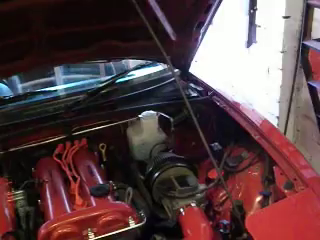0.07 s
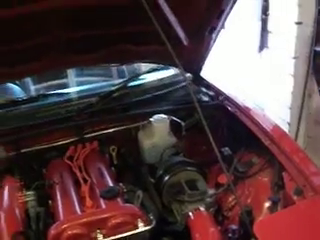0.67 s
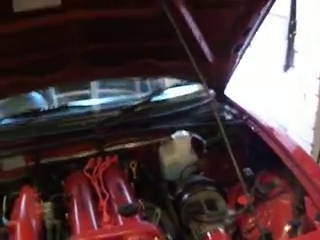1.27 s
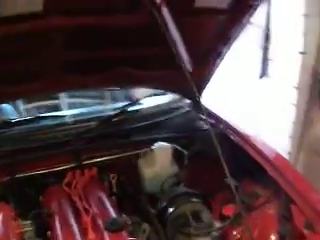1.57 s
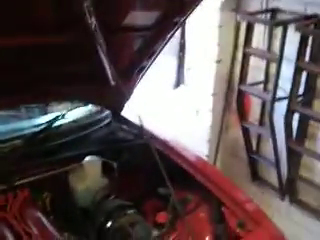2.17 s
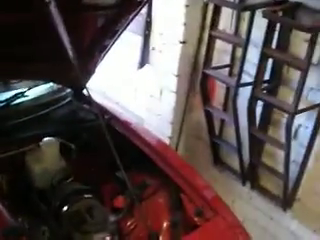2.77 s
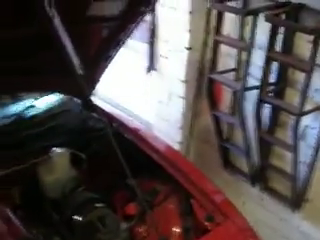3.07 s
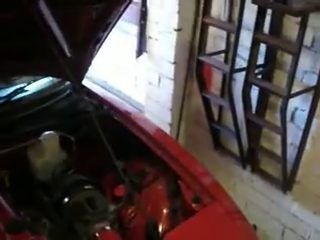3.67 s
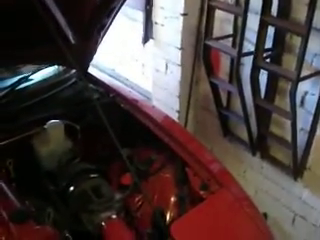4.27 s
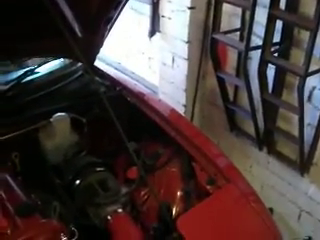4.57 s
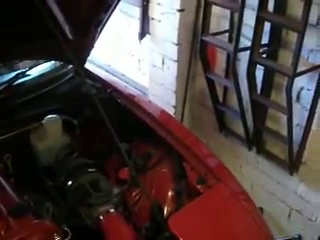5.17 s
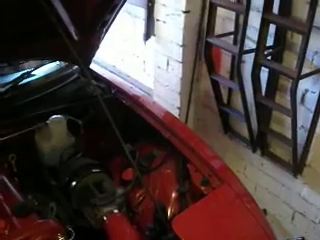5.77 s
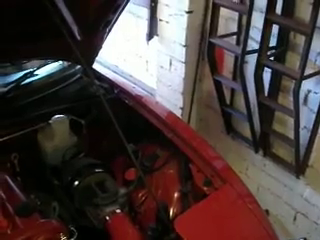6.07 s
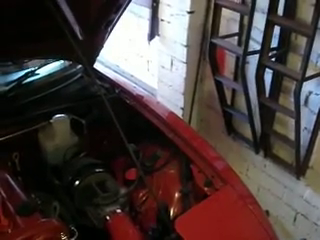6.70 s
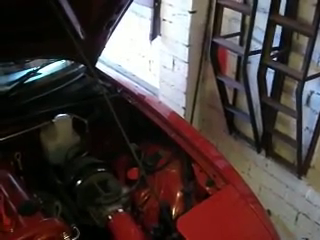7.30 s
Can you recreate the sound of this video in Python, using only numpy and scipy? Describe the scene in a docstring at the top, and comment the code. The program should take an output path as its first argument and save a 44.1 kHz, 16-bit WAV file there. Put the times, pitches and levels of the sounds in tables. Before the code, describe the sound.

Sharp, uneven ticks from loose valve gear ring out over the clatter, dull knocks and low boom of an idling car engine. It is heard close up in a garage, through a hand-held microphone moving over the open bay. Near the end the engine speeds up and holds a fast idle, the boom thinning as a soft whine appears. Two brief handling clicks occur, one early and one just before the end.

```python
"""A four-cylinder petrol engine idles in an open bay inside a garage, its loose valve gear ticking.
Irregular impacts excite the resonances of its steel, over block clatter, dull piston slaps and the
periodic boom of the exhaust. Near the end the revs rise and the meshing teeth of the timing belt whine.
A hand-held microphone moves along the bay and is knocked twice; its gain ducks after loud peaks."""
import sys
import numpy as np
from scipy import signal
from scipy.fft import rfft, irfft, next_fast_len
from scipy.io import wavfile
from scipy.ndimage import uniform_filter1d, map_coordinates

SR = 44100
rng = np.random.default_rng(int(sys.argv[2]) if len(sys.argv) > 2 else 0)


def transcribe(u):
    """Save the signal u as a 16-bit wav file named by the first command-line argument.

    u: samples, shape (n,) or (channels, n), limited to [-1, 1]; the rate is SR.
    q: integer samples, one column per channel.
    """
    v = np.clip(np.atleast_2d(u).T, -1, 1)
    q = np.round(v * 32767).astype(np.int16)
    wavfile.write(sys.argv[1], SR, q)


N = 328104
IDLE_HZ = 27.5  # firings per second


def amp(db):
    """Decibels as an amplitude ratio."""
    return 10 ** (np.asarray(db) / 20)


def unit(x):
    """Normalisation to rms 1."""
    return x / np.sqrt(np.mean(x ** 2) + 1e-20)


def along(points, hz):
    """Interpolation of (Hz, value) points on a logarithmic frequency axis."""
    f, values = np.transpose(points)
    return np.interp(np.log(hz + 1), np.log(f + 1), values)


def curves(rows):
    """Linear interpolation in time: one value per sample for each column after the first."""
    times, *columns = np.transpose(rows)
    return [np.interp(np.arange(N) / SR, times, column) for column in columns]


def wobble(rate):
    """Smooth random modulation: a spline through `rate` knots a second."""
    return map_coordinates(rng.standard_normal(int(N * rate / SR) + 4), [np.arange(N) * rate / SR])


def filtered(x, gain):
    """Zero-phase filtering by a gain that depends on frequency."""
    size = next_fast_len(N + SR // 2)
    return irfft(rfft(x, size) * gain(np.fft.rfftfreq(size, 1 / SR)), size)[:N]


def add(track, start_s, sound):
    """Superposition of a sound on the track."""
    part = track[max(round(start_s * SR), 0):][:len(sound)]
    part += sound[:len(part)]


def resonance_db(resonances, hz):
    """Resonance: each mode adds a bell-shaped peak or dip in dB."""
    return sum(lift / (1 + (2 * (hz - f) / width) ** 2) for f, width, lift in resonances)


def struck(force, spectrum, resonances, coupling=1, size=8192):
    """Convolution: a force rings metal through a minimum-phase impulse response of unit energy."""
    hz = np.fft.rfftfreq(size, 1 / SR)
    db = along(spectrum, hz) + coupling * resonance_db(resonances, hz)
    db -= 40 * np.clip(hz / 6300 - 1, 0, 1)  # treble roll-off
    cepstrum = irfft(np.log(amp(db)))[:size // 2]
    causal = 2 * cepstrum * (np.arange(size // 2) > 0)
    ring = irfft(np.exp(rfft(causal, size)))
    return signal.oaconvolve(force, ring / np.linalg.norm(ring))[:N]


def scattered(envelope):
    """Multipath scattering: a blow becomes a burst of noise with a nearly flat spectrum."""
    x = envelope * rng.standard_normal(len(envelope))
    for _ in range(6):  # flatten the spectrum, then restore the envelope
        x = irfft(np.exp(1j * np.angle(rfft(x))), len(x))
        x = x * envelope / np.sqrt(np.abs(uniform_filter1d(x * x, size=64)) + 1e-20)
    return x


def bay_reverb(x, t60, wet_db):
    """Reverberation: dense reflections between bonnet, bulkhead and walls decay exponentially."""
    t = np.arange(SR // 4) / SR
    tail = rng.standard_normal(len(t)) * amp(-60 * t / t60) * (t > .003)
    return x + amp(wet_db) * signal.fftconvolve(x, tail / np.linalg.norm(tail))[:N]


# The microphone's path. Each row: time in seconds, place from 0 (over the manifold) to 1 (by the wing).
MIC_PATH = [(0, 0), (1.2, 0), (1.9, 0.53), (3.2, 0.41), (4.2, 1), (7.44, 0.94)]
# Resonances and gaps of block, manifold and valve cover.
# Each row: frequency in Hz, width in Hz, lift in dB over the manifold, lift in dB by the wing.
METAL_MODES = [(538.2, 30, 4.5, 10), (664, 40, -5.5, -3.5), (728, 33, 4, 6.5), (893, 58, 10, 6.5),
               (962.5, 24, 5.5, 10.5), (1020, 42, 6.5, 3.5), (1106, 31, 3, 4.5), (1164, 71, 5.5, 0),
               (1270, 79, -7.5, -3), (1681, 29, 5.5, 6), (1764, 35, -0.5, 10.5), (1823, 45, 5, 7.5),
               (1980, 45, 8, 0.5), (2043, 47, 8, 9), (2095, 33, 5.5, 4), (2210, 72, -5, -1),
               (2660, 37, 5, 7), (3360, 66, 6, 5), (3490, 59, -0.5, 8.5), (4910, 100, 10, 7)]
def engine_metal(force, spectrum, coupling=1):
    """Directional radiation: the strength of each resonance depends on the listening position."""
    place = curves(MIC_PATH)[0]
    manifold = struck(force, spectrum, [(hz, width, db) for hz, width, db, _ in METAL_MODES], coupling)
    wing = struck(force, spectrum, [(hz, width, db) for hz, width, _, db in METAL_MODES], coupling)
    return (1 - place) * manifold + place * wing


# Finger knocks. Each row: start in seconds, level in dB.
CASE_KNOCKS = [(2.4272, 5.5), (7.1172, 4)]
# Modes of the case. Each row: frequency in Hz, level in dB, time to fall 60 dB in seconds.
CASE_MODES = [(670, -18, 0.018), (1257, -4, 0.013), (1414, -3.5, 0.016), (1820, -1, 0.009),
              (3400, -13, 0.007)]
def case_knocks():
    """Damped free vibration: the microphone's plastic case rings when a finger knocks it."""
    t = np.arange(SR // 16) / SR
    ring = sum(amp(db - 60 * t / t60) * np.sin(2 * np.pi * hz * t) for hz, db, t60 in CASE_MODES)
    attack = 1 - np.exp(-t / 0.00081)
    track = np.zeros(N)
    for start, db in CASE_KNOCKS:
        noise = 0.35 * amp(-60 * t / 0.016) * rng.standard_normal(len(t))
        add(track, start, amp(db) * attack * (ring + noise))
    return track


# Belt tones: teeth mesh 11.5 times a firing, with sidebands and overtones.
# Each row: multiple of the firing rate, level in dB.
BELT_TONES = [(9, -7), (10.5, -10.5), (11.5, 0.5), (12.5, -6), (20.5, -11), (23, -4), (24, -8.5)]
# Resonances that the belt excites. Each row: frequency in Hz, width in Hz, lift in dB.
BELT_MODES = [(453.5, 80, 14), (537, 49, 18.9), (1010, 40, 19)]
def belt_whine(firing_hz, firings):
    """Forced vibration: meshing tones grow with the revs and swell as they glide through resonances."""
    flutter = 0.16 * wobble(30) + 0.12 * wobble(80)
    drive_db = -58.5 + 16.5 * np.log2(firing_hz / IDLE_HZ)
    whine = np.zeros(N)
    for order, db in BELT_TONES:
        level = amp(drive_db + db + resonance_db(BELT_MODES, order * firing_hz) + 0.74 * wobble(22))
        whine += level * np.sin(2 * np.pi * (order * firings + rng.random()) + flutter)
    return np.sqrt(2) * whine


# Piston knocks. Each row: time in seconds, level in dB.
PISTON_SLAPS = [(0.323, -12), (0.759, -10), (0.836, -13.5), (1.081, -13), (1.665, -9), (2.292, -8.5),
                (2.962, -11), (3.412, -11.5), (3.559, -14), (3.66, -13), (4.299, -14), (4.4, -17.5),
                (4.659, -13), (5.001, -11), (5.497, -13.5)]
# Their spectrum. Each row: frequency in Hz, level in dB.
SLAP_SPECTRUM = [(300, -10.5), (700, -1), (1200, 0), (2000, -1), (3000, -9), (6000, -16)]
def piston_slaps(level_db=-2.5, rise_s=.001, t60=.055):
    """Impact excitation: a piston rocks against its bore and rings the block with a dull knock."""
    t = np.arange(SR // 12) / SR
    envelope = (1 - np.exp(-t / rise_s)) * amp(-60 * t / t60)
    force = np.zeros(N)
    for time, db in PISTON_SLAPS:
        add(force, time - rise_s, amp(level_db + db) * scattered(envelope))
    return engine_metal(force, SLAP_SPECTRUM, coupling=0.7)


# The boom dips briefly as the revs climb and returns weaker. Each row: time in seconds, level in dB.
BOOM_LEVELS = [(0, -14.5), (5.4, -14), (5.63, -10.5), (6.08, -18), (6.17, -38.5), (6.33, -21),
               (7.44, -20.5)]
# Exhaust and block hum, plus one accessory's hum at 5.17 times the firing rate. Each row: multiple of the
# firing rate, level in dB.
OVERTONES = [(2, -37.5), (3, -46.5), (4, -50), (5.17, -56.5), (6, -55), (7, -52.5), (8, -50.5), (9, -52),
             (10, -49.5), (11, -49), (12, -45.5), (13, -51), (14.5, -46.5)]
# Air resonances of the bay. Each row: frequency in Hz, width in Hz, lift in dB.
AIR_MODES = [(94, 7.9, 5), (112.7, 13, 9.5), (140.9, 22, 13), (218.4, 11, 11), (293, 11, -2)]
# Load as the throttle opens. Each row: time in seconds, boost in dB, an unused level in dB.
THROTTLE_LOAD = [(0, -1, -1), (5.35, -2, -2), (5.5, 0.5, 4), (5.66, 7.5, 10.5), (5.85, 0.5, -2),
                 (6.3, -3, -2), (7.25, -2.5, -2), (7.44, 2.5, 5)]
# Spectrum of the exhaust's rumble. Each row: frequency in Hz, level in dB.
RUMBLE_SPECTRUM = [(8, -17.5), (18, 4.5), (35, 1.5), (60, -20), (100, -22), (200, -33.5), (500, -87.5)]
def exhaust(firing_hz, firings, hum_db=0.27, rumble_db=-24.5):
    """Periodic excitation: firing pulses make a boom and overtones, joined by an accessory's hum, coloured by
    the bay, over a rumble."""
    load_db = curves(THROTTLE_LOAD)[0]
    note = -amp(curves(BOOM_LEVELS)[0]) * np.sin(2 * np.pi * firings)
    for order, db in OVERTONES:
        air_db = resonance_db(AIR_MODES, order * firing_hz)
        boost_db = load_db * 2 / order  # load feeds mainly the low overtones
        level = amp(hum_db + db + air_db + boost_db + 1.7 * wobble(9))
        note += level * np.sin(2 * np.pi * (order * firings + rng.random()) + 0.3 * wobble(13))
    rumble = unit(filtered(rng.standard_normal(N), lambda hz: amp(along(RUMBLE_SPECTRUM, hz))))
    return np.sqrt(2) * note + amp(rumble_db + load_db) * rumble


def contacts(rate):
    """Shot noise: random small impacts, `rate` a second on average, at rms 1."""
    return unit((rng.random(N) < rate / SR) * rng.standard_normal(N))


def cam_contacts(firings, jitter_s, count=170):
    """Cyclic excitation: impacts recur at the same shaft angles every four firings, at rms 1."""
    angles, strengths = 4 * rng.random(count), rng.uniform(-1, 1, count)
    due = np.arange(0, firings[-1], 4)[:, None] + angles
    samples = np.interp(due, firings, np.arange(N), right=2 * N)
    samples += jitter_s * SR * rng.standard_normal(due.shape)
    sizes = strengths * amp(1.8 * rng.standard_normal(due.shape))
    return unit(np.bincount(np.abs(samples).astype(int).ravel(), sizes.ravel(), N)[:N])


def valve_seating(firings, spread_db, t60):
    """Exponential decay: each of eight valve closings a cycle starts the envelope of a short flurry."""
    closings = np.flatnonzero(np.diff(np.floor(2 * firings)))
    strengths = amp(spread_db * np.clip(rng.standard_normal(len(closings)), -2, 2))
    decay = amp(-60 * np.arange(SR // 8) / SR / t60)
    return unit(signal.fftconvolve(np.bincount(closings, strengths, N), decay)[:N])


def valve_lash(depth_db, lead_s):
    """Backlash: parts lose contact just before each hard tick, so the clatter's gain dips."""
    t = np.arange(N) / SR
    due = np.append(np.sort(np.array(HARD_TICKS)[:, 0]), N)
    wait = due[np.searchsorted(due, t)] - t
    return amp(-depth_db * np.exp(-wait / lead_s))


# Load on the valve gear over one cycle. Each row: shaft angle in firings, level in dB.
CAM_LOAD = [(0, 3), (.4, 3.5), (.9, 5.5), (1.35, 3), (1.6, 3), (2, 5.5), (2.5, 2), (3, 1.5), (3.3, -2),
            (3.55, 5.5), (3.8, 1.5)]
# Contact spectra of the block and of the valve gear. Each row: frequency in Hz, level in dB.
BLOCK_SPECTRUM = [(40, -4), (90, -2), (170, -7), (290, -6), (400, -2), (650, -3.5), (1000, 1), (1500, -2),
                  (2300, -7.5), (3500, -10.5), (6000, -18)]
GEAR_SPECTRUM = [(300, -17.5), (900, -6), (1800, 4), (2800, 4.5), (3500, 1.5), (4200, -1.5), (4900, 0.5),
                 (6000, 2.5)]
# Slow level changes as the microphone moves and the revs rise.
# Each row: time in seconds, then gains in dB for the block, its low band and the valve gear.
CLATTER_LEVELS = [(0, 0.5, -3, -1.5), (1.5, -0.3, -2, 0.5), (2.4, 1.1, -0.5, 2), (3.8, -1.5, 1.5, 1.5),
                  (5, 0, 0, 1.8), (5.7, -3, 0, -3.5), (6, -4, 0.5, -6.5), (6.3, -0.5, -.5, 0),
                  (7.44, -1, -2, 2.5)]
def clatter(firing_hz, firings):
    """Modulated impact noise: pistons, rockers and injectors follow revs, cam load and valve seating."""
    evening = IDLE_HZ / firing_hz  # modulation evens out as the revs rise
    load_db = np.interp(firings, *np.transpose(CAM_LOAD), period=4)
    load_db = load_db.mean() + (load_db - load_db.mean()) * evening
    flurry = np.abs(valve_seating(firings, spread_db=3.5, t60=0.14)) ** evening
    slack = valve_lash(depth_db=3.5, lead_s=0.007)
    knocking = 0.67 * cam_contacts(firings, jitter_s=.00005) + 0.72 * contacts(rate=2000)
    rattling = .5 * cam_contacts(firings, jitter_s=.0001) + 0.63 * contacts(rate=6000)
    knocking *= slack * amp(0.88 * load_db + wobble(14) * evening) * np.hypot(1, 0.53 * flurry)
    rattling *= slack * amp(load_db) * np.hypot(1, 2.4 * flurry)
    block = engine_metal(knocking, BLOCK_SPECTRUM)
    block = unit(bay_reverb(block, t60=0.14, wet_db=-5.5))
    gear = engine_metal(rattling, GEAR_SPECTRUM, coupling=0.61)
    gear = unit(bay_reverb(gear, t60=0.077, wet_db=0))
    block_db, low_db, gear_db = curves(CLATTER_LEVELS)
    low_band = filtered(block, lambda hz: 1 / (1 + (hz / 620) ** 8))
    block += (amp(low_db) - 1) * low_band
    octaves = np.log2(firing_hz / IDLE_HZ)
    return amp(-23 + 3 * octaves + block_db) * block + amp(-31.5 + 1.6 * octaves + gear_db) * gear


def light_ticks(firings, tries_per_cycle=7, chance=.6):
    """Intermittent contact: slack parts touch while the cam loads them. Gives (seconds, dB) rows."""
    cycles = np.repeat(np.arange(0, firings[-1], 4), tries_per_cycle)
    draw, offset = rng.random((len(cycles), 2)).T
    angles = (cycles + 3.3 + 3 * offset)[draw < chance]  # within three firings of every four
    return [(start, -26.5 + 0.5 * rng.standard_normal()) for start in np.searchsorted(firings, angles) / SR]


def blow(t, rise_s=0.0016):
    """An impact's envelope: zero before contact, a peak of 1 at rise_s, then exponential decay."""
    age = np.maximum(t, 0) / rise_s
    return age * np.exp(1 - age)


# Hard strikes of the loose valve gear. Each row: start in seconds, level in dB.
HARD_TICKS = [(0.0557, -11.5), (0.1258, -19.5), (0.1986, -24), (0.2705, -19.5), (0.3234, -13.5),
              (0.3462, -8.5), (0.4404, -15.5), (0.5955, -26), (0.6095, -21), (0.7314, -19.5), (0.758, -21),
              (0.8946, -16.5), (0.932, -17.5), (1.027, -11), (1.081, -24), (1.147, -16.5), (1.1722, -13.5),
              (1.1945, -22), (1.322, -15.5), (1.3691, -17.5), (1.5132, -8), (1.5844, -11), (1.6198, -15.5),
              (1.6634, -13.5), (1.7736, -19), (1.8047, -4), (1.8663, -7.5), (1.9512, -9.5), (2.0558, -13.5),
              (2.1004, -7.5), (2.1569, -9.5), (2.3156, -16), (2.3509, -14.5), (2.3902, -15),
              (2.4836, -10.5), (2.5334, -4), (2.6058, -16), (2.6787, -11), (2.777, -12.5), (2.8245, -12.5),
              (2.92, -21), (2.9619, -24), (3.0372, -22), (3.0771, -14.5), (3.116, -9), (3.19, -11.5),
              (3.2176, -12.5), (3.2774, -17), (3.3152, -12), (3.4976, -18), (3.557, -21), (3.7654, -18),
              (3.803, -10), (3.843, -15), (3.984, -9), (4.0583, -19), (4.089, -13.5), (4.135, -15.5),
              (4.223, -14.5), (4.277, -21.5), (4.3433, -14), (4.4886, -14.5), (4.5291, -9.5), (4.6326, -16),
              (4.659, -16), (4.6786, -21), (4.7329, -19), (4.7819, -19.5), (4.8138, -19), (4.9495, -9),
              (5.0737, -17), (5.098, -21), (5.2918, -12.5), (5.361, -21.5), (5.5315, -13), (5.59, -19.5),
              (5.6543, -19.5), (5.7358, -17.5), (5.8339, -16.5), (5.862, -17.5), (5.9401, -20),
              (6.0292, -17.5), (6.051, -20.5), (6.1219, -14.5), (6.138, -15), (6.1743, -5), (6.261, -16),
              (6.2962, -12), (6.355, -12.5), (6.414, -18), (6.485, -14), (6.5942, -11.5), (6.6553, -11),
              (6.7688, -4), (6.891, -11.5), (6.9373, -12), (7.061, -16.5), (7.2459, -7), (7.3076, -12),
              (7.3598, -18), (7.3829, -15)]
# The steel ring that all ticks share. Each row: frequency in Hz, width in Hz, lift in dB.
TAPPET_MODES = [(901, 210, 10.5), (1080, 57, 6), (1480, 100, 5.5), (1739, 110, 12), (1850, 70, 8),
                (2006, 120, 2), (2415, 70, 10.5), (2663, 52, 12), (3010, 95, 4.5), (3310, 100, 9.5),
                (3494, 120, 11.5), (3763, 130, 5.5), (4646, 56, 3.5), (4890, 150, 9)]
# Spectra of the bright strike and of its knock on the block. Each row: frequency in Hz, level in dB.
TICK_SPECTRUM = [(300, -2), (600, -4.5), (1000, -4), (2000, -2), (2800, -1.5), (3500, 0.5), (4200, 2),
                 (5100, 0.5), (6000, 4.5)]
TICK_BODY_SPECTRUM = [(300, -11), (650, -11), (870, 6.5), (1100, -4.5), (1400, -6), (1800, -2.5),
                      (2500, -2), (5000, -32)]
def valve_ticks(firings, rebound_s=.0058, tail_t60=0.12, shake_t60=0.11):
    """Impact and rebound: one steel part strikes, rings, knocks the block and shakes loose parts."""
    t = np.arange(SR // 8) / SR
    strike = np.hypot(blow(t), amp(-5.5) * blow(t - rebound_s))
    envelope = np.hypot(strike, amp(-13.5 - 60 * t / tail_t60))  # with its tail in the bay
    manifold, wing = scattered(envelope), scattered(envelope)  # the blow as heard at each place
    force, shake = np.zeros(N), np.zeros(N)
    for start, db in list(HARD_TICKS) + light_ticks(firings):
        blend = np.pi / 2 * np.interp(start, *np.transpose(MIC_PATH))
        variation = .5 * envelope * rng.standard_normal(len(t))
        add(force, start, amp(db) * (np.cos(blend) * manifold + np.sin(blend) * wing + variation))
        add(shake, start, amp(db - 8 - 60 * t / shake_t60) * (1 - np.exp(-t / 0.0033)))
    force += shake * contacts(rate=8200)
    ring = struck(force, TICK_SPECTRUM, TAPPET_MODES)
    body = struck(force, TICK_BODY_SPECTRUM, TAPPET_MODES)
    return ring + amp(-17) * body


# Engine speed. Each row: time in seconds, firing rate in Hz.
FIRING_RATE = [(0, 27.24), (.4, 27.39), (2.2, 27.43), (2.7, 27.69), (3.3, 27.44), (4.2, 27.57),
               (5.38, 27.67), (5.55, 29.5), (5.68, 33.2), (5.77, 37), (5.88, 40.7), (5.98, 43.1),
               (6.1, 44.9), (6.25, 46.5), (6.5, 47.7), (6.9, 47.15), (7.15, 47.3), (7.3, 49.1),
               (7.44, 52.2)]
def scene():
    """Superposition: the engine's sources, sharing one crankshaft phase, add to the knocks on the case."""
    firing_hz = curves(FIRING_RATE)[0]
    firings = np.cumsum(firing_hz) / SR  # shaft angle, four firings to a cycle
    engine = exhaust(firing_hz, firings) + belt_whine(firing_hz, firings)
    engine += clatter(firing_hz, firings) + valve_ticks(firings) + piston_slaps()
    return (engine + case_knocks())[None]


def gain_control(x, threshold_db, share, release_db_per_s):
    """Compression: peaks cut the gain by a share of their excess within a millisecond; it creeps back."""
    over_db = share * np.maximum(20 * np.log10(np.abs(x) + 1e-9) - threshold_db, 0)
    recovery = release_db_per_s * np.arange(N) / SR
    cut_db = np.maximum.accumulate(over_db + recovery) - recovery
    return x * amp(-uniform_filter1d(cut_db, size=40, origin=4))


# The microphone's frequency response. Each row: frequency in Hz, gain in dB.
MIC_RESPONSE = [(4900, -0.5), (5300, -4), (5700, -17), (6000, -23), (6300, -42.5), (6800, -69.5)]
def record(dry, top_hz=16500):
    """Band limiting and saturation: the microphone loses treble, ducks and flattens the highest peaks."""
    x = filtered(dry[0], lambda hz: amp(along(MIC_RESPONSE, hz)))
    x = gain_control(x, threshold_db=-5.5, share=0.75, release_db_per_s=43.5)
    x = np.clip(x, -.73, .73)
    fade_in = np.clip((np.arange(N) / SR - .035) / .003, 0, 1)  # silent for the first 35 ms
    return filtered(x * fade_in, lambda hz: hz < top_hz)[None]


dry = scene()
out = record(dry)
transcribe(out)
```